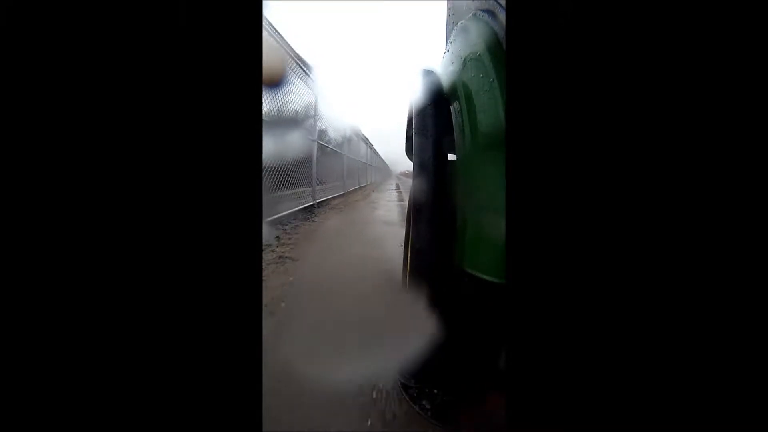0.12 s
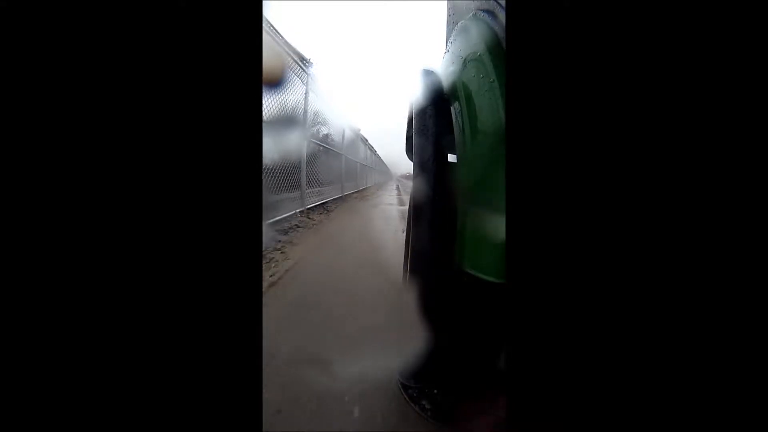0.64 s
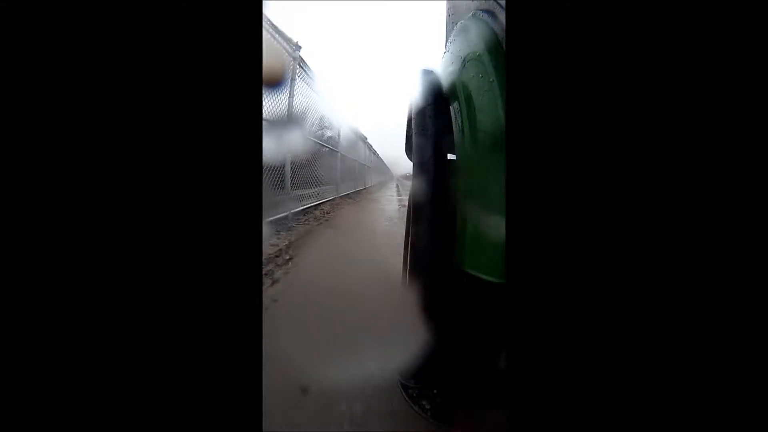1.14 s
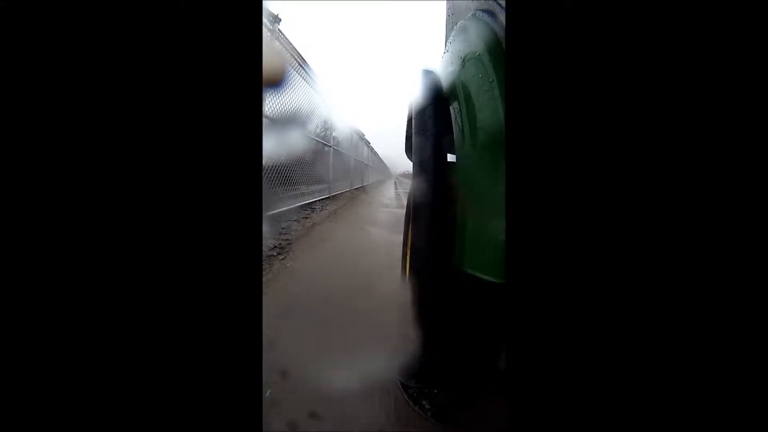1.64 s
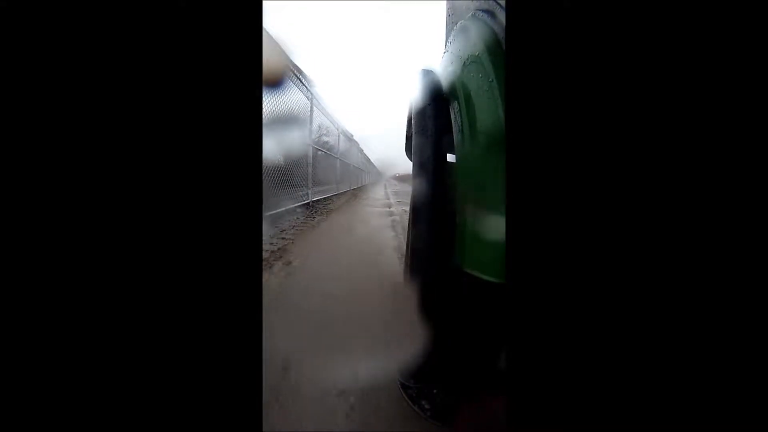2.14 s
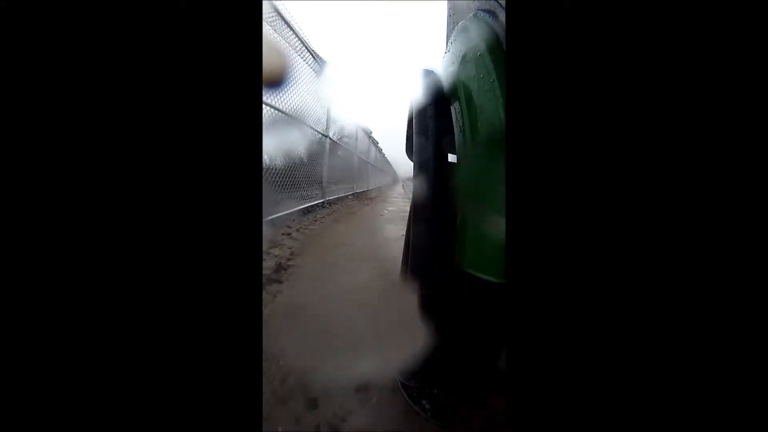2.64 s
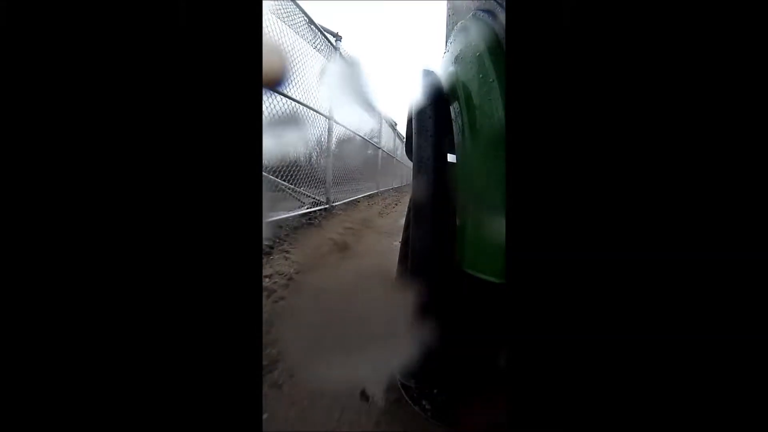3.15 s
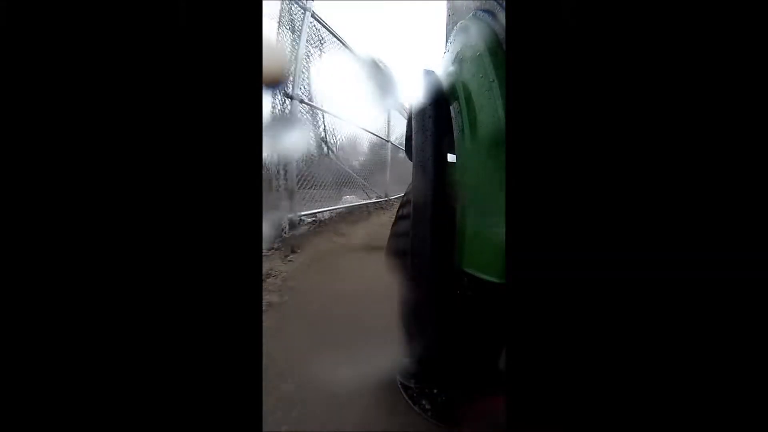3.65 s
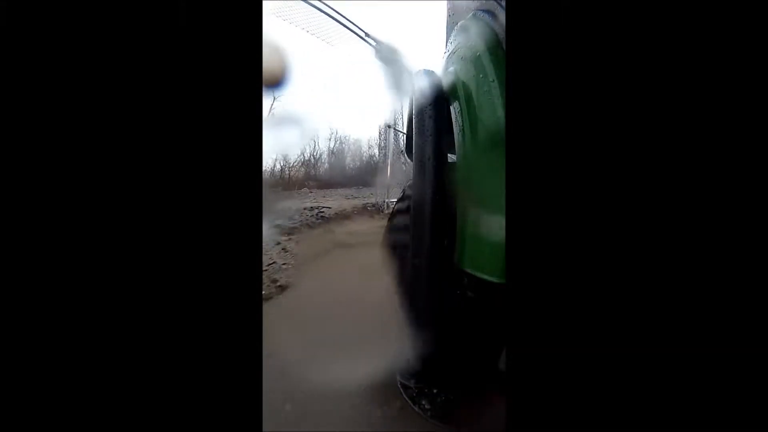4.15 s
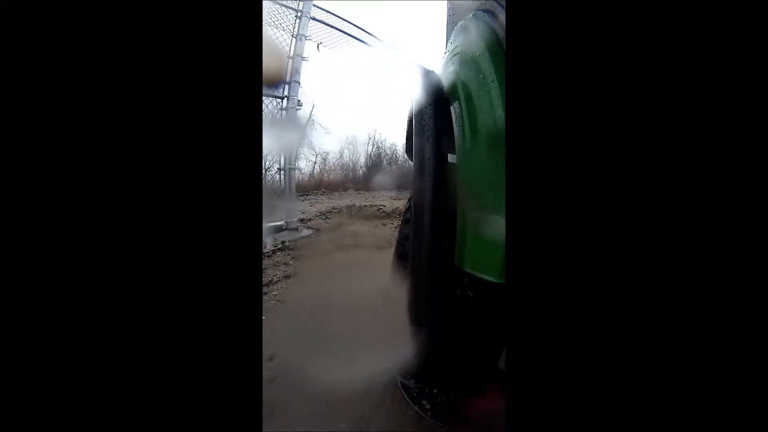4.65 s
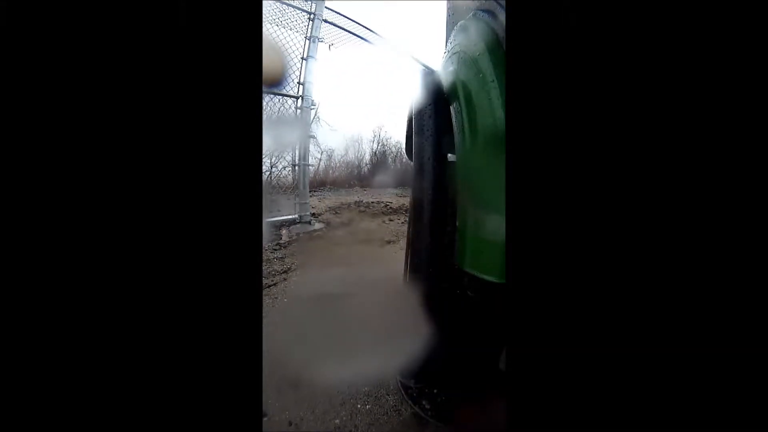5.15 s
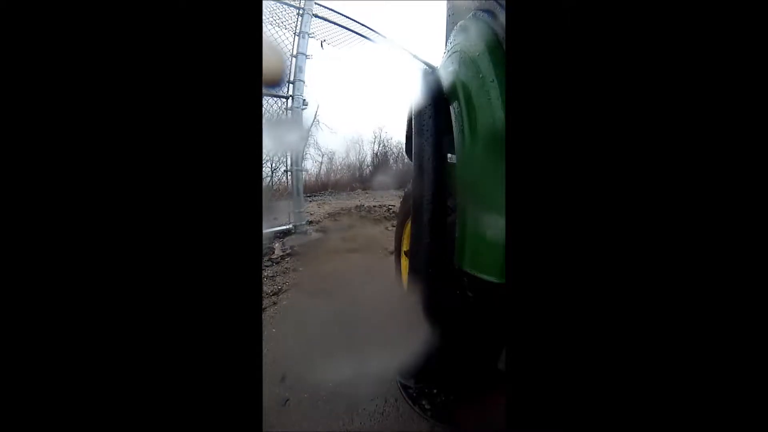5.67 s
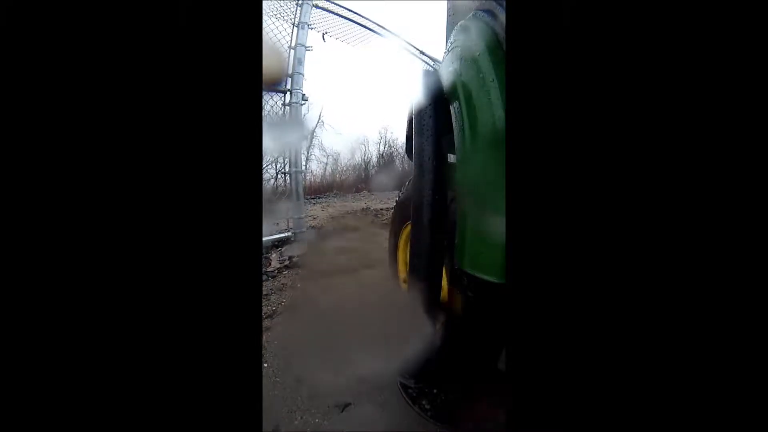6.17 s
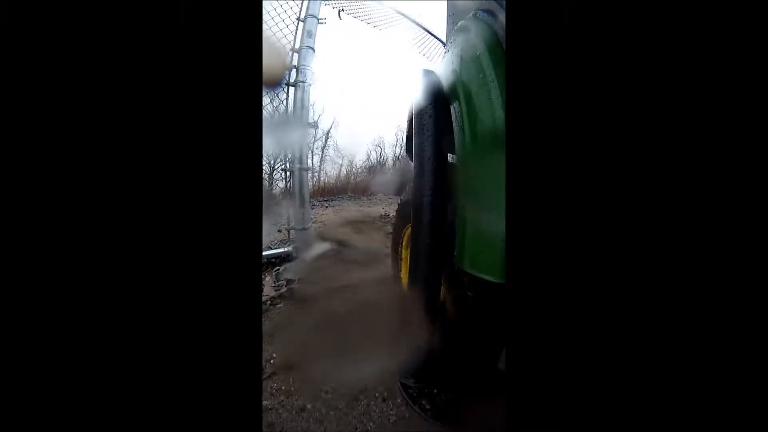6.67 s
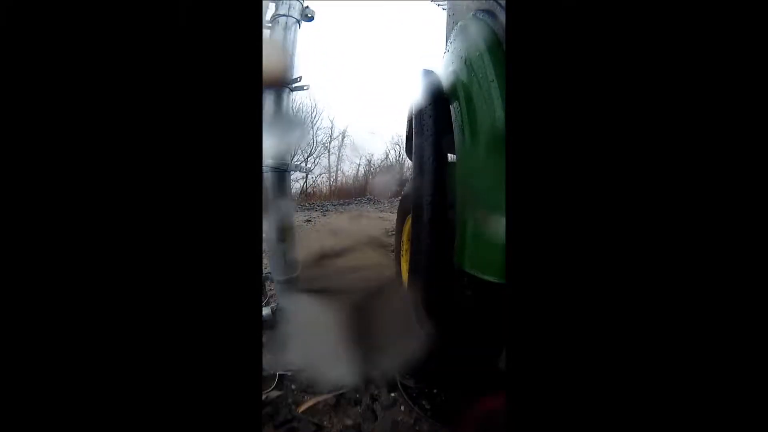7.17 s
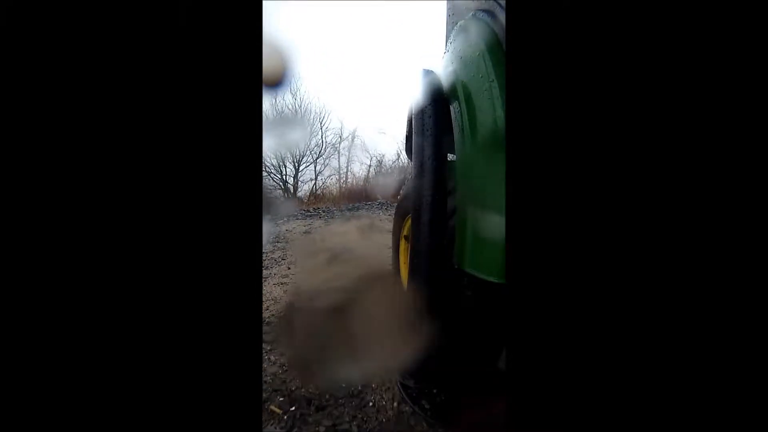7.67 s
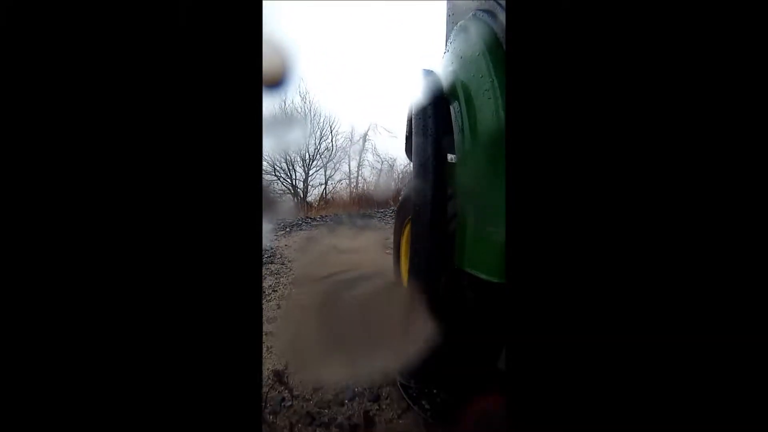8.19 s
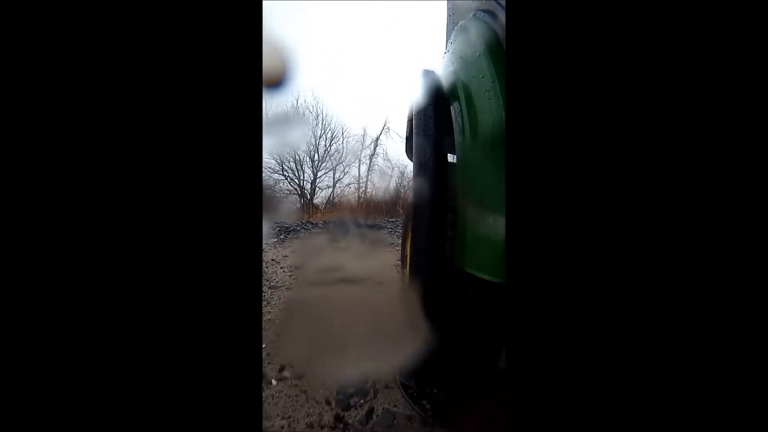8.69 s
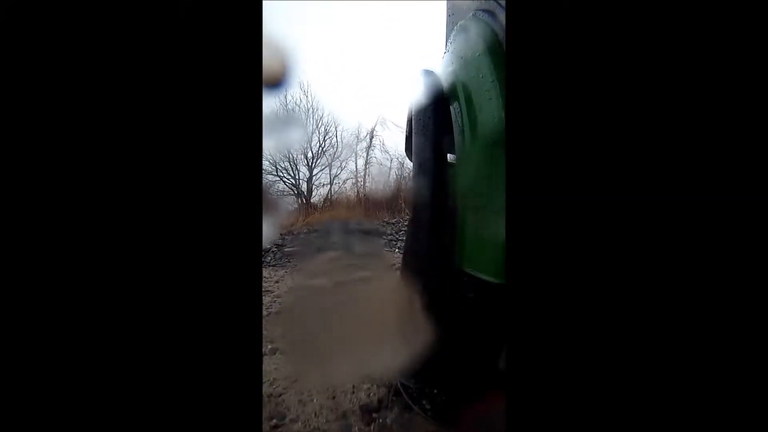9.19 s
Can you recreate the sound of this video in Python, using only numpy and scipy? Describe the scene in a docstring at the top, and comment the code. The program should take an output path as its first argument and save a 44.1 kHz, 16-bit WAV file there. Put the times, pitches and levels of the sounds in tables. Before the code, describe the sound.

A small three-cylinder diesel is heard close and boomy through a sealed little camera on the side of a utility vehicle on a wet track. From 0 to 1.4 s it holds a steady, fairly fast low drone with buzzing unevenness and panel rumble. From 1.5 s it winds down, the hum gliding lower and separating into pulses, reaching a slow, lumpy idle around 5 to 5.5 s. Sharp grit clicks strike at 4.8 and 5.3 s, followed by small ticks and barely audible metal pings. At 5.6 s it pulls hard, knocking, and climbs quickly to 6.2 s. It holds, then sags to a slower throb by 7.7 s, with snappy ticks near 7.1 and 7.4 s. It rises in two steps to 8.7 s and stays fairly high to the end at 9.3 s. Faint valve clatter, rattle and fine spray persist; the treble is thin and gritty.

```python
"""Diesel utility vehicle on a wet track

A three-cylinder diesel slows to idle and pulls away again, heard by a small sealed camera on its flank.
Firing orders boom through body and pipe as sines, uneven cylinders add thirds between them as filtered pulses,
shaped noise makes rumble, clatter and rattle, short rings make grit ticks and a few metal pings.
The camera holds each 12 kHz sample four times, which mirrors the sound up high."""
import sys
import numpy as np
from scipy import signal
from scipy.fft import rfft, irfft, next_fast_len
from scipy.io import wavfile
from scipy.ndimage import uniform_filter1d

SR = 44100
rng = np.random.default_rng(int(sys.argv[2]) if len(sys.argv) > 2 else 0)


def wav_record(signal):
    """Record a signal, one row per channel, as 16-bit PCM in the file named by sys.argv[1]."""
    frames = np.transpose(np.atleast_2d(signal))
    bounded = np.clip(frames, -1, 1)
    # unit amplitude maps onto the largest positive 16-bit level
    quanta = np.round(bounded * 32767).astype(np.int16)
    wavfile.write(sys.argv[1], SR, quanta)


def volts_from_db(level):
    """Convert decibel levels to linear amplitude ratios."""
    exponent = np.asarray(level, float) / 20
    return 10 ** exponent


N = 410571

# Relative push of the three cylinders against their mean, in firing order.
CYLINDER_PUSH = [1.0, -.3, -.7]


def colour(x, points):
    """Filter by (Hz, dB) points, joined on a log axis; rms 1."""
    hz, db = np.transpose(points)
    size = next_fast_len(len(x) + SR)
    at = np.log(np.arange(size // 2 + 1) * SR / size + 1)
    gain = volts_from_db(np.interp(at, np.log(hz), db))
    y = irfft(rfft(x, size) * gain, size)[:len(x)]
    return y / np.std(y)


def walk(rate):
    """Random levels held 1 / rate s and slewed twice; spread 1."""
    k = int(SR / rate)
    held = np.repeat(rng.standard_normal(N // k + 1), k)
    y = uniform_filter1d(uniform_filter1d(held, k), k)[:N]
    return y / np.std(y)


def curves(table):
    """Columns of a table whose first column is seconds, one value a sample."""
    s, *columns = np.transpose(table)
    return [np.interp(np.arange(N) / SR, s, c) for c in columns]


def on_log(hz, table):
    """Columns of a table whose first column is Hz, read on a log axis."""
    at, *columns = np.transpose(table)
    return [np.interp(np.log(hz), np.log(at), c) for c in columns]


def sways(rows):
    """Sum of smooth bumps in dB."""
    t = np.arange(N) / SR
    return sum(db * np.exp(-((t - s) / half) ** 2) for s, half, db in rows)


def orders(hz, turns, load):
    """Clean multiples of the firing rate, blurring as they rise; each pipe resonance passed turns the phase."""
    # Body and pipe, unloaded, as the first nine orders sweep through. Each row: frequency in Hz, level in dB.
    body = [(22.0, -45.5), (26.0, -24.0), (31.0, -10.5), (40.0, -8), (52.0, -14.5), (64.0, -19),
            (75.0, -25), (92.0, -26.5), (110.0, -8.5), (127.0, -6), (150.0, -15.5), (170.0, -22),
            (190.0, -23), (208.0, -15.5), (230.0, -9), (258.0, -13), (280.0, -2), (305.0, -1.5),
            (337.0, -16), (360.0, -10), (385.0, -13.5), (410.0, -8.5), (450.0, -17.5), (500.0, -19),
            (540.0, -10.5), (620.0, -30)]
    # Change of that response at full load. Each row: frequency in Hz, change in dB.
    pull = [(22.0, -8), (32.0, -18), (45.0, -10.5), (60.0, 6), (75.0, 12), (92.0, 20), (115.0, -7),
            (140.0, 0.5), (165.0, 11), (190.0, 13.5), (220.0, -3.5), (260.0, -11), (300.0, -15),
            (360.0, -3.5), (450.0, -10), (620.0, 17.5)]
    # Body and pipe as heard by orders 10 and up. Each row: frequency in Hz, level in dB.
    upper = [(100, -30), (150, -30), (220, -64), (300, -47.5), (400, -63.5), (550, -61), (700, -67),
             (950, -73)]
    # Firing pulse shape, a row for each of orders 1 to 9: strength in dB at mid_hz,
    # change at full load in dB, change per octave of speed in dB.
    order_db = [(0.5, -2.5, 1), (-15.5, 10.5, 0), (-16.5, 6, 0.5), (-18.0, -1.0, -5), (-31.5, 15.5, -7.5),
                (-30.5, 2.5, -3), (-31, -2.5, -1), (-34, -2, -4.5), (-34, 3, -7.5)]
    # Single orders swell or fade for a moment, one list for each of orders 1 to 9.
    # Each row: centre in seconds, half length in seconds, change in dB.
    order_sways = [
        [],
        [(1.7, 0.16, 1.5), (4.7, 0.11, -10), (5.68, 0.083, 5.5), (7.1, 0.27, -8.5), (7.8, 0.14, 3.5),
         (9.3, 0.14, -5.5)],
        [(5.15, .15, -7), (6.3, .1, -6), (8.95, 0.18, 2.5)],
        [(3.8, .2, 5.5), (5.3, 0.23, 2), (5.85, 0.1, 8), (6.4, 0.51, -5.5), (8.2, 0.31, -11.5), (8.7, .1, 3.5)],
        [(3.2, .2, -7), (4.5, .15, 5), (7.75, .12, 7)],
        [(8.0, .5, -8)],
        [(2.4, .2, 3.5), (4.95, .12, 6), (6.6, .3, -8), (9.25, 0.24, 6)],
        [(3.7, 0.33, -9.5), (4.3, .12, 4), (7.1, .12, 8), (7.75, .15, 8)],
        [(3.6, 0.22, -5), (7.45, .35, 9.5)],
    ]
    # Resonances that delay the orders near them. Each row: frequency in Hz, width in Hz, shift at full load in Hz.
    pipe_modes = [(28, 17, 20), (201, 6, -22), (247, 51, -64)]
    mid_hz = 45

    out = 0
    for k in range(1, 15):
        if k <= len(order_db):
            mid_db, load_db, octave_db = order_db[k - 1]
            db = on_log(k * hz, body)[0] + mid_db
            db = db + octave_db * np.log2(hz / mid_hz)
            db = db + load * (on_log(k * hz, pull)[0] + load_db)
            db = db + sways(order_sways[k - 1])
        else:
            db = on_log(k * hz, upper)[0]
        lag = -2.8  # radians
        for mode_hz, width, shift in pipe_modes:
            lag = lag + np.arctan((k * hz - mode_hz - shift * load) / width)
        wander = 0.0035 * k * k * walk(20.0)
        level = np.sqrt(2) * volts_from_db(db + 0.2 * k * walk(18.0))
        out = out + level * np.cos(k * 2 * np.pi * turns - lag + wander)
    return out


def uneven_firings(hz, turns):
    """What each firing pushes above or below the mean (cylinder pattern plus chance), smeared by the frame."""
    # Body and pipe as heard by single uneven firings. Each row: frequency in Hz, relative level in dB per Hz.
    pipe = [(15, -43), (45, 1), (90, 1), (135, -7.5), (185, 5), (230, -2.5), (300, -12.5), (370, -15),
            (450, -10.5), (520, -12.5), (600, -23), (700, -27), (840, -35), (1000, -60.5), (6000, -100)]
    at = np.flatnonzero(np.diff(np.floor(turns)))
    chance = 0.11 * rng.standard_normal(N // 100)[:len(at)]
    pulses = np.zeros(N)
    pulses[at] = np.resize(CYLINDER_PUSH, len(at)) + chance
    t = np.arange(SR // 10) / SR
    # a sweep falling from 900 Hz: the frame passes the highs first and lets the lows out late
    frame = np.cos(2 * np.pi * 900 * t * (1 - t / 0.06)) * (t < 0.03)
    pushes = signal.fftconvolve(pulses, frame)[:N]
    return colour(pushes / np.sqrt(hz), pipe)


def rumble(turns):
    """Noise of tyres and panels that shake in step with the firings and swell at random."""
    # Spectrum of the rumble. Each row: frequency in Hz, relative level in dB per Hz.
    rumble_bands = [(12, -11.5), (30, -14.5), (70, -1.5), (150, 0.5), (250, -6), (388, -2.5), (461, -13.5),
                    (541, -15), (800, -27), (980, -34), (1300, -36.5), (1700, -66), (2800, -120)]
    shake = 1 + 0.089 * np.cos(2 * np.pi * turns)
    return colour(shake * volts_from_db(1.35 * walk(7.4)) * rng.standard_normal(N), rumble_bands)


def clatter(hz, turns, load):
    """Valve train hiss that peaks twice a firing, each beat its own size; under load each firing knocks sharply."""
    # Spectrum of the clatter. Each row: frequency in Hz, relative level in dB per Hz.
    clatter_bands = [(530, -28), (900, -7.5), (1010, -23), (1320, -11.5), (1590, -0.5), (1840, -0.5),
                     (2650, -14.5), (3080, -10.5), (3470, -12.5), (3970, -19), (6000, -23), (7800, -52),
                     (13200, -120)]
    knock_full_hz = 40  # firings knock fully below this rate and more faintly above it
    knock = load * np.minimum((knock_full_hz / hz) ** 2, 1)
    beat = 2 * turns
    size = volts_from_db(3.5 * rng.standard_normal((N // 100, 2)))
    valves = size[beat.astype(int), 0] * np.exp(-(beat % 1) / 3.4)
    knocks = 8 * knock * size[turns.astype(int), 1] * np.exp(-(turns % 1) / 0.05)
    return colour((1.76 + 1.9 * valves + knocks) * rng.standard_normal(N), clatter_bands)


def rattle(turns):
    """Small metal parts chatter about three times a firing at uneven moments, loudest in a few bands."""
    # Spectrum of the rattle. Each row: frequency in Hz, relative level in dB per Hz.
    rattle_bands = [(1500, -33), (2000, -2), (2300, 7.5), (2650, -9), (3050, -3), (3250, -12.5), (3450, 2),
                    (3800, -16.5), (5000, -30)]
    jolts = np.diff(np.floor(3 * turns + 0.3 * walk(150.0)), prepend=0) != 0
    hits = uniform_filter1d(jolts * volts_from_db(3.2 * rng.standard_normal(N)), size=90)
    return colour((hits / np.std(hits) + 1.2) * rng.standard_normal(N), rattle_bands)


def ticks():
    """Each grain cracks and rings the housing, at its own spot; fine spray patters on between them."""
    # Grit on the housing. Each row: start in seconds, peak in dB, brightness in dB.
    grit = [(0.9702, -40, -22), (1.3247, -35, -21), (1.63, -29, -16), (3.2947, -31, -13),
            (3.3309, -37, -12), (3.7549, -36.5, -13), (3.9384, -27.5, -6), (4.14, -38, -12),
            (4.566, -39, -18), (4.8415, -18, -11), (4.897, -35, -8), (4.981, -36, -8), (5.1505, -45, -23),
            (5.3197, -16, 6), (5.636, -36, -9), (5.712, -39, -10), (5.7464, -41, -17), (5.78, -36, -11),
            (5.811, -33, -10), (5.871, -38, -8), (5.9928, -36, -4), (6.039, -38, -8), (6.0594, -35, -11),
            (6.133, -32, -16), (7.0774, -40, 2), (7.1039, -21.5, -7), (7.233, -40, -40), (7.3213, -29, -17),
            (7.394, -14.5, -7), (7.8476, -33, -9), (7.895, -29.5, -5), (7.9884, -41, -15),
            (8.271, -37, -15), (8.5804, -37, -14), (8.9317, -27, -15), (9.0232, -37, -26),
            (9.1202, -34, -38), (9.174, -37, -5)]
    # Housing modes. Each row: frequency in Hz, relative level in dB, time to fall 60 dB in seconds.
    housing = [(1030, -14.5, 0.0066), (1610, 1, 0.015), (2160, 1.5, 0.013), (2560, 3, 0.0089),
               (3050, 0.5, .007), (3430, 5, 0.0061), (4080, 4.5, .004), (4930, 10.5, 0.004),
               (5450, 0, 0.0032)]
    out, t = np.zeros(N + SR), np.arange(SR // 20) / SR
    spray = rng.random((3, 200))
    fine = np.transpose([spray[0] * N / SR, -47 + 8 * spray[1] ** 2, -8 + 6 * spray[2]])
    n = np.arange(160)
    for s, peak_db, bright_db in np.concatenate([grit, fine]):
        push = np.cos(n * 0.45 + 0.5 * rng.standard_normal(160)) * n * np.exp(-n / 5.0)
        push = rng.choice([-1, 1]) * push
        spot = 1 + 0.015 * rng.standard_normal(len(housing))
        ring = np.zeros(len(t))
        for (hz, db, t60), shift in zip(housing, spot):
            # brightness acts on the upper modes, fully from 4400 Hz
            level = volts_from_db(db + np.clip((hz - 2400) / 2000, 0, 1) * bright_db)
            ring += level * np.sin(2 * np.pi * hz * shift * t) * np.exp(-np.log(1000) * t / t60)
        ring[0] = 6 * volts_from_db(bright_db)  # the bare crack
        tick = np.convolve(ring, push)
        out[int(s * SR):][:len(tick)] += volts_from_db(peak_db) * tick / np.abs(tick).max()
    return out[:N]


def pings(turns, count=6):
    """A loose part pings once an engine cycle as the engine leaves idle: one metal mode, fainter each time."""
    first_s, first_db, fade_db = 5.421, -50, 1.4
    ping_hz, t60_s, attack_s = 3080, 0.05, 0.0033
    out, t = np.zeros(N), np.arange(SR // 10) / SR
    ring = np.sin(2 * np.pi * ping_hz * t) * np.exp(-np.log(1000) * t / t60_s)
    ring = ring * np.minimum(t / attack_s, 1)
    cycles = np.arange(count)
    # one engine cycle is one firing of every cylinder
    at = np.searchsorted(turns, turns[int(first_s * SR)] + len(CYLINDER_PUSH) * cycles)
    out[at] = volts_from_db(first_db - fade_db * cycles)
    flutter = volts_from_db(4 * walk(200.0))
    return signal.fftconvolve(out, ring / ring.max())[:N] * flutter


def scene():
    """Engine, ground rumble and grit at one microphone."""
    # The drive. Each row: time in seconds, firing rate in Hz, engine load from 0 to 1.
    drive = [(0.0, 67.83, 0.4), (0.28, 67.7, 0.43), (1.4, 68.05, 0.44), (1.82, 64.13, 0.23),
             (2.1, 59.73, 0), (2.24, 57.6, 0.23), (2.4, 58.5, 0), (2.8, 54.74, 0), (3.22, 50.67, 0.24),
             (3.64, 45.68, 0.35), (3.92, 41.56, 0.52), (4.34, 37.18, 0.58), (4.62, 32.53, 0.59),
             (4.9, 25.55, 0.58), (5.04, 23.65, 0.24), (5.53, 22.43, 0), (5.62, 24.1, 0.72),
             (5.88, 35.74, 0.96), (6.16, 52.28, 0.56), (6.26, 53.8, 0.23), (6.72, 52.47, 0.28),
             (7.0, 48.0, 0.27), (7.28, 42.1, 0.63), (7.42, 41.83, 0.42), (7.7, 37.98, 0.62),
             (7.98, 44.82, 0.66), (8.12, 45.76, 0.42), (8.33, 44.2, 0.73), (8.61, 55.05, 0.54),
             (8.68, 56.36, 0.0), (8.92, 53.75, 0), (9.31, 57.1, 0.06)]
    # Noise layers against engine speed. Each row: firing rate in Hz, uneven firings in dB,
    # rumble in dB, clatter in dB, fast rattle in dB.
    by_speed = [(21.97, -35, -32, -53.5, -65), (29.684, -31, -30.5, -53, -66),
                (38.5, -34, -31.5, -53.5, -64.5), (47.17, -38.5, -34, -53.5, -71.5),
                (53.72, -36, -34, -52, -64.5), (60.8, -35, -30.5, -49.5, -65), (66.9, -26.5, -30, -49, -58)]
    # Slow swells as the ground changes. Each row: time in seconds, rumble and uneven firings in dB,
    # clatter and rattle in dB.
    swell = [(0, -0.5, 0.5), (1, 1.6, 0.9), (1.45, 0.5, 0.3), (1.75, -1, -2), (2.5, 2.2, -0.3),
             (3.4, 0, -2), (4, .1, 0.3), (4.5, 2, 2.5), (4.95, -2, -0.5), (5.2, 3.5, 2), (5.45, -1, -1),
             (6, 0.5, 0.6), (6.3, 2, 0.5), (6.8, -0.2, 3.5), (7.05, -0.5, -2), (7.4, 0, -0.5), (7.8, 3, 2),
             (8.1, -0.5, -0.5), (8.6, 0.3, -0.9), (9, 1.6, 0.5), (9.31, 2, -1)]
    uneven_load_db, rumble_load_db = -1.5, 1  # added at full load

    hz, load = curves(drive)
    load = np.clip(load, 0, 1)
    uneven_db, rumble_db, clatter_db, rattle_db = on_log(hz, by_speed)
    hz = hz * (1 + 0.002 * walk(6.0))  # the governor lets the speed waver
    turns = np.cumsum(hz) / SR  # firings so far
    low_db, high_db = curves(swell)

    low = volts_from_db(uneven_db + uneven_load_db * load) * uneven_firings(hz, turns)
    low = low + volts_from_db(rumble_db + rumble_load_db * load) * rumble(turns)
    high = volts_from_db(clatter_db) * clatter(hz, turns, load) + volts_from_db(rattle_db) * rattle(turns)
    mix = orders(hz, turns, load) + volts_from_db(low_db) * low
    mix = mix + volts_from_db(high_db + 0.67 * walk(9.0)) * high
    return (mix + ticks() + pings(turns))[None]


def roll_off(x):
    """The treble ends steeply here."""
    return signal.sosfilt(signal.butter(12, 16520, fs=SR, output="sos"), x)


def record(dry):
    """Sampled at 12 kHz, each value repeated four times: the steps mirror the sound around multiples of 12 kHz."""
    hold_hz, top_hz = 12000, 15900
    slow = signal.resample_poly(dry, hold_hz // 300, SR // 300, axis=1, padtype="line")
    held = np.repeat(slow, 4, axis=1)
    steps = signal.resample_poly(held, SR // 300, 4 * hold_hz // 300, axis=1, padtype="line")[:, :N]
    low_pass = signal.ellip(8, 0.2, 70, top_hz, fs=SR, output="sos")
    return roll_off(signal.sosfilt(low_pass, steps))


dry = scene()
out = record(dry)
wav_record(out)
```